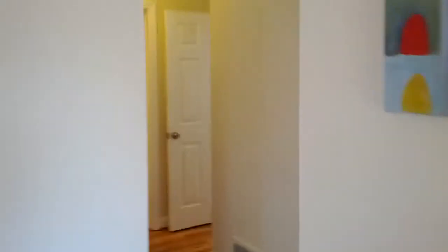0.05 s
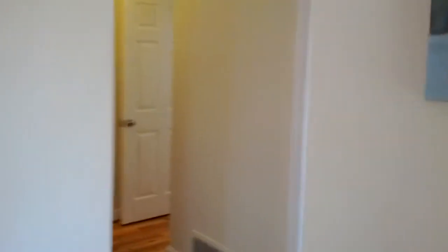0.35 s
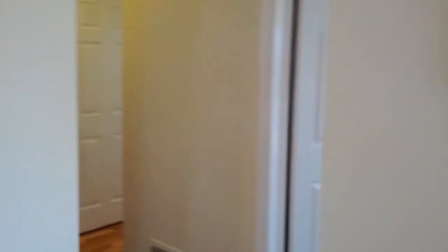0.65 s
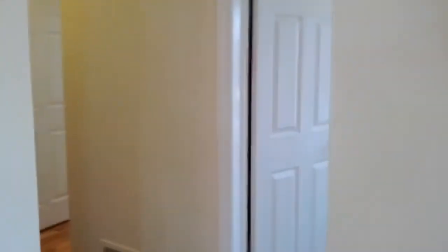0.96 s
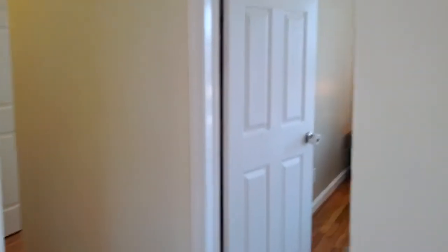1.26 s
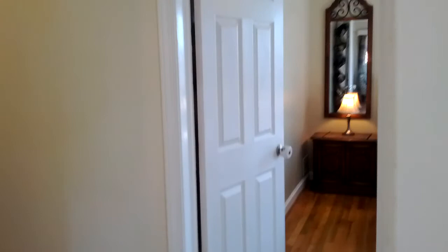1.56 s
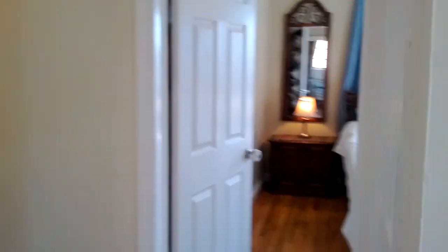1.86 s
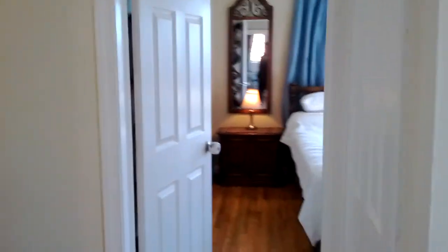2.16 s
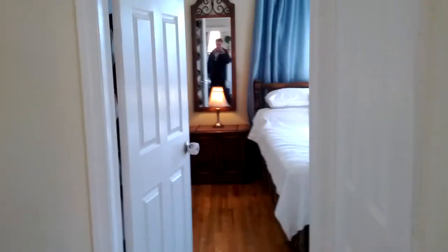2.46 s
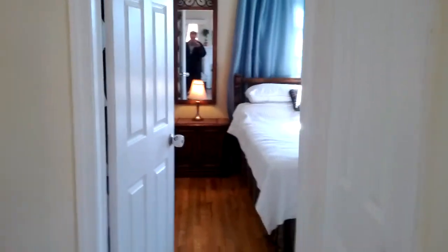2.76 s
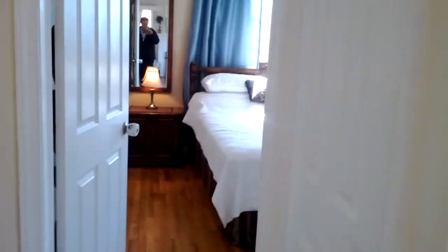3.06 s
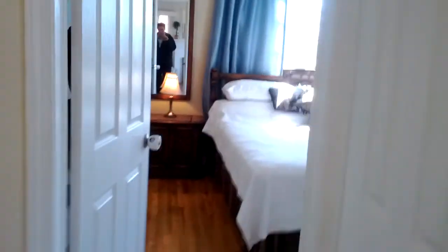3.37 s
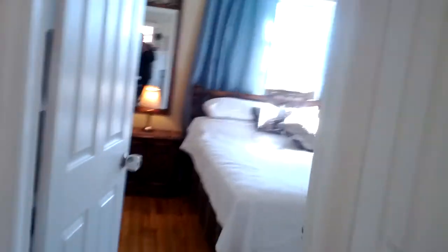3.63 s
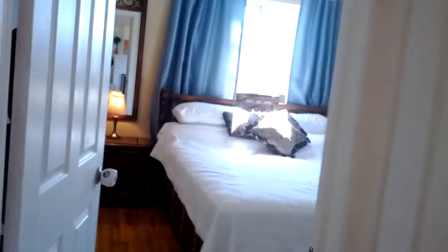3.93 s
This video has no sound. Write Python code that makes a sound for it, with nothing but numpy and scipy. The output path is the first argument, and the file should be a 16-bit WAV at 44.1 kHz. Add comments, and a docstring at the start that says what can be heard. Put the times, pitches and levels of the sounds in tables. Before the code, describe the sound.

Wooden floorboards creak and tick under slow, soft footsteps in a quiet hallway.

```python
"""Someone carries a camera slowly over a wooden floor in a quiet, faintly humming house.
First, clothes swish, soft steps thud and shake the camera, and fingers click on its case.
Then, from about 2.6 s, two floorboards creak in turn: the wood sticks and slips in quick snaps
that slow down into single ticks. At the very end come a low rumble, two clacks of a loose board
and a thud as the sound cuts off. A small bare hallway echoes the steps and the boards."""
import sys
import numpy as np
from scipy import signal
from scipy.fft import rfft, irfft, next_fast_len
from scipy.io import wavfile
from scipy.ndimage import map_coordinates

SR = 44100
rng = np.random.default_rng(int(sys.argv[2]) if len(sys.argv) > 2 else 0)


def output_pcm(signal):
    """Save a mono or channel-first signal as 16-bit PCM at the path in sys.argv[1].

    Samples are clipped to [-1, 1] before scaling.
    """
    pcm = np.clip(np.atleast_2d(signal).T, -1, 1) * 32767
    wavfile.write(sys.argv[1], SR, np.round(pcm).astype(np.int16))


N = 176400  # 4 seconds
SNAP_RISE_S = 0.00021

# The tone colour (how strong each pitch is) of rubbing fabric: pitch_hz, level_db
FABRIC_COLOUR = [(200, 4.5), (700, 3), (2000, -2.5), (5000, -6.5), (9000, -4.5), (12000, -8), (16000, -16)]


def creak(course, colour, knock_db, room_db, jitter, scatter_db, breakaway_db):
    """A board sticks and slips. Every slip rings alike, so a fast run of them has a pitch."""
    times, slips_per_s, levels_db = np.transpose(course)
    breakaway_s, fade_db_per_s = 0.0088, 13
    crack, ring = snap(lambda hz: along(colour, hz), knock_db, room_db)
    out, now = np.zeros(N), times[0]
    for lateness, weakness in rng.standard_normal((16, 2)):
        if now > times[-1]:
            break
        age = now - times[0]
        # The crack starts breakaway_db off its usual level, settles quickly, then slowly softens.
        crack_db = breakaway_db * np.exp(-age / breakaway_s) - fade_db_per_s * age
        slip_db = np.interp(now, times, levels_db) - scatter_db * weakness
        add(out, now, amp(slip_db) * (amp(crack_db) * crack + ring))
        now += (1 + jitter * lateness) / np.interp(now, times, slips_per_s)
    return out


def creaking_boards():
    """Two boards give under the foot, one after the other, each with its own tone."""
    # How each creak slows down: time_s, slips_per_s, level_db
    first_course = [(2.5742, 99.3, -31), (2.584, 136, -32), (2.592, 130, -33), (2.615, 116, -41),
                    (2.633, 96, -37.5), (2.644, 64, -39), (2.68, 52.7, -38), (2.706, 45, -37.5)]
    second_course = [(3.1123, 106.2, -34), (3.135, 109.9, -33), (3.165, 106.2, -36), (3.178, 94.7, -31.5),
                     (3.188, 61.4, -33), (3.206, 58, -39), (3.228, 55, -52)]
    # The tone colour of each board: pitch_hz, level_db
    first_colour = [(200, 2.5), (1000, -0.5), (2100, 0), (2800, 1), (3700, 3), (5000, -1), (7000, 1.5),
                    (9200, 3.5), (11500, -2.5), (16000, 0)]
    second_colour = [(110, 5), (250, -2.5), (440, 5.5), (680, 1.5), (850, -2), (2300, 0.5), (3700, -1),
                     (7400, 2), (8700, 2.5), (10300, -1), (11800, -3.5), (16000, -2)]
    first = creak(first_course, first_colour, knock_db=-0.5, room_db=1.5,
                  jitter=0.0088, scatter_db=0.2, breakaway_db=4.5)
    second = creak(second_course, second_colour, knock_db=0.5, room_db=-0.5,
                   jitter=0.0047, scatter_db=3.0, breakaway_db=-1)
    return first + second


def snap(shade, knock_db, room_db):
    """One slip of a board: a short crack, and the ring of floor, wall and hallway that follows."""
    # The tone colours of the crack and of the hallway: pitch_hz, level_db
    crack_colour = [(200, -15), (1300, 0.5), (3000, -4.5), (6000, -4.5), (9000, -4), (11500, -14),
                    (16000, -21)]
    hall_colour = [(60, -14), (150, 5.5), (400, 2.5), (800, 0), (1400, -2.5), (2800, -5.5), (4800, -8),
                   (7000, -10.5), (8800, -11), (11500, -17), (16000, -29)]
    # The notes the floor rings at: pitch_hz, level_db, fade_s
    floor_notes = [(103.2, -1.5, 0.15), (151.5, 0, 0.62), (224.2, -4, 0.47), (306.5, 2, 0.19),
                   (426.8, -3.5, 0.31), (652.6, -4.5, 0.16)]
    size = len(ring_time())
    crack = noise(crack_colour, size, shade, spiky_db=-2.5)
    crack *= envelope(SNAP_RISE_S, fade_s=0.0063, hold_s=0.0024)
    knock = ringing_wood(floor_notes, shade)
    hall_echo = hallway(noise(hall_colour, size, shade))
    ring = amp(knock_db - 14) * knock + amp(room_db - 4.5) * hall_echo
    wall_echo = noise(crack_colour, size, shade) * envelope(rise_s=0.0015, fade_s=0.031)
    add(ring, start_s=0.016, sound=amp(-3.5) * wall_echo)
    return crack, ring


def ringing_wood(notes, shade=lambda hz: 0):
    """Knocked wood rings at several notes at once, each dying away at its own speed."""
    t, out = ring_time(), 0
    for hz, level_db, fade_s in notes:
        tone = np.sin(2 * np.pi * (hz * t + rng.random()))
        out += amp(level_db + shade(hz)) * tone * envelope(SNAP_RISE_S, fade_s)
    return out


def ticks():
    """Lone slips as weight comes on or off a board. Each spot has its own woody peak in the tone."""
    # Single snaps: start_s, level_db, brightness_db_per_octave, knock_db, peak_hz, boost_db, room_db
    slips = [(.589, -45, -6, -1, 900, 3, -7), (2.2577, -53, -1, 0, 5000, 5, 2),
             (2.3422, -38, -.7, 1, 2900, 4, 0), (2.7655, -42, -1, 0, 2800, 4, 2),
             (2.836, -35, -.7, -2, 1100, 3, -2), (3.2649, -29, .5, -4, 1600, 3, -3),
             (3.3082, -30, .2, -2, 1100, 5, -2), (3.4418, -47, -3, -8, 1550, 10, -7),
             (3.5226, -46, -2, -14, 1650, 16, -10), (3.5378, -44, 1, -8, 1800, 3, -5),
             (3.6206, -49, -1, -2, 1600, 4, -2), (3.8242, -39, -3, -4, 1700, 3, -3),
             (3.9002, -44, .7, -6, 1300, 2, -1)]
    out = np.zeros(N)
    for start_s, level_db, brightness, knock_db, peak_hz, boost_db, room_db in slips:
        def shade(hz):
            tilt_db = brightness * np.log2(np.maximum(hz, 230))  # flat below 230 Hz
            return tilt_db + boost_db * hump(hz, peak_hz, width_octaves=0.38)
        crack, ring = snap(shade, knock_db, room_db)
        add(out, start_s, amp(level_db) * (crack + ring))
    return out


def clacks():
    """A loose board clacks twice: a hard crack and a short, hollow ring."""
    # The two hits: start_s, level_db, wood_ring_db
    hits = [(3.9537, -32.5, 2), (3.9756, -34, 7)]
    # The notes the loose board rings at: pitch_hz, level_db, fade_s
    board_notes = [(282, -5.5, .16), (648, -7, 0.098), (1052, -4.5, 0.063), (1210, -8, 0.052),
                   (1362, -3, .08), (2170, -13, .05), (3680, -9.5, 0.041)]
    colour = [(500, 0.5), (3500, -0.5), (9000, -2.5), (15000, -2)]  # pitch_hz, level_db
    out = np.zeros(N)
    for start_s, level_db, wood_ring_db in hits:
        wood = amp(wood_ring_db) * ringing_wood(board_notes)
        crack, ring = snap(lambda hz: along(colour, hz), knock_db=1, room_db=1)
        add(out, start_s, amp(level_db) * (crack + ring + wood))
    return out


def thuds():
    """Low thuds. In a step, a soft heel rings the floor, the hallway booms on and the sole scuffs."""
    # Soft steps; the last two rows are a low rumble and a thud as the sound cuts off.
    # Columns: start_s, level_db, pitch_hz, scuff_db, fade_s
    low_hits = [(.415, -40.5, 183.5, -12.5, 0.071), (0.589, -43, 157.6, -11.5, 0.029),
                (.92, -54, 192, -12, 0.072), (1.191, -46, 204, -24, 0.088), (1.227, -48, 100, -25, 0.094),
                (1.288, -47, 182, -16, 0.16), (1.358, -44, 285, -18, 0.066), (1.423, -48.5, 237, -37, 0.33),
                (1.611, -45.5, 310, -24, 0.045), (1.996, -37.5, 171, -36, 0.053),
                (2.143, -45, 159, -5, 0.055), (2.5424, -34.5, 159, -3.5, 0.039),
                (3.749, -38, 270, -30, 0.052), (3.86, -50, 220, -8, 0.1), (3.983, -36, 272, -27, 0.092)]
    scuff_colour = [(300, 6.5), (900, -3.5), (1800, -24), (9000, -19), (15000, -32)]  # pitch_hz, level_db
    out, t = np.zeros(N), ring_time()
    for start_s, level_db, pitch_hz, scuff_db, fade_s in low_hits:
        thud = 2 * np.sin(2 * np.pi * pitch_hz * t) * envelope(0.0014, fade_s)
        rumble = filtered(rng.standard_normal(len(t)), lambda hz: hump(hz, pitch_hz, width_octaves=0.5))
        boom = amp(-9) * hallway(unit(rumble))
        scuff = amp(scuff_db) * noise(scuff_colour, len(t)) * envelope(SNAP_RISE_S, fade_s=0.37)
        add(out, start_s, amp(level_db) * (thud + boom + scuff))
    return out


def jolts():
    """Each stride shakes the camera in the hand: a deep wobble that soon dies away."""
    # The shakes: start_s, level_db, pitch_hz
    shakes = [(0.443, -39.5, 23.7), (0.596, -39, 27.3), (1.208, -34.5, 35), (1.289, -38.5, 45.2),
              (1.561, -57, 36), (2.009, -40.5, 54), (2.55, -40, 61.8)]
    out = np.zeros(N)
    for start_s, level_db, pitch_hz in shakes:
        wobble = np.sin(2 * np.pi * pitch_hz * ring_time())
        add(out, start_s, amp(level_db) * wobble * envelope(rise_s=0.005, fade_s=0.55))
    return out


def clothes():
    """Fabric swishes with the stride, fluttering slightly."""
    # How the swish swells and sinks: time_s, level_db
    swish = [(0, -58.5), (.25, -57), (.45, -62.5), (.6, -59), (1.11, -62), (1.31, -55), (1.41, -56),
             (1.52, -65), (1.72, -61.5), (1.86, -68), (2.1, -59), (2.25, -64.5), (2.35, -57), (2.5, -65.5),
             (3.05, -64), (3.5, -58.5), (3.7, -63), (3.82, -58.5)]
    times, levels_db = np.transpose(swish)
    t = np.arange(N) / SR
    flutter_db = 1.28 * map_coordinates(rng.standard_normal(200), [t * 40])  # 40 random values a second
    return amp(np.interp(t, times, levels_db) + 2 + flutter_db) * noise(FABRIC_COLOUR, N)


def handling():
    """Fingers click on the camera's case and fabric brushes close to the microphone."""
    # Finger clicks and fabric brushes: start_s, level_db
    finger_clicks = [(.708, -38), (1.2975, -44)]
    fabric_brushes = [(.356, -52), (3.105, -49)]
    case_colour = [(2000, -9), (5000, 4), (16000, -3)]  # pitch_hz, level_db
    out, t = np.zeros(N), ring_time()
    for start_s, level_db in finger_clicks:
        click = noise(case_colour, len(t)) * amp(-60 * t / 0.002)  # gone in 2 ms
        add(out, start_s, amp(level_db) * click)
    for start_s, level_db in fabric_brushes:
        brush = noise(FABRIC_COLOUR, len(t)) * envelope(rise_s=0.0013, fade_s=0.17)
        add(out, start_s, amp(level_db) * brush)
    return out


def hallway(steady_noise):
    """Turn steady noise into the hallway's echo, where the high pitches die first."""
    # How long the echo lasts: pitch_hz, fade_s
    echo_times = [(100, 0.62), (500, 0.48), (2500, 0.43), (8000, 0.26), (15000, 0.24)]
    hz, t, spectrum = signal.stft(steady_noise, SR, nperseg=256)
    fade = amp(-60 * t / along(echo_times, hz)[:, None])
    echo = signal.istft(spectrum * fade, SR, nperseg=256)[1][:len(steady_noise)]
    return echo * (1 - np.exp(-ring_time() / 0.00098))  # builds up in about 1 ms


def house():
    """The low rush of a quiet room, with a faint hum from the mains electricity."""
    # The tone colour of the quiet room: pitch_hz, level_db
    room_colour = [(12, -42), (20, 3), (65, 5.5), (120, -6.5), (187, -6.5), (241, -3.5), (262, -15.5),
                   (434, -10), (527, -24.5), (738, -20.5), (2320, -26), (8890, -30), (16000, -30)]
    hum_hz = 60.4
    hum = np.sin(2 * np.pi * hum_hz * np.arange(N) / SR)
    return amp(-56.5) * noise(room_colour, N) + amp(-61.5) * hum


def amp(db):
    """Turn decibels into a number to multiply by."""
    return 10 ** (np.asarray(db) / 20)


def unit(x):
    """Scale a sound to an average strength (rms) of 1."""
    return x / np.sqrt(np.mean(x ** 2) + 1e-20)


def along(points, hz):
    """Read between (pitch_hz, value) points, with pitch spaced in octaves."""
    pitches, values = np.transpose(points)
    return np.interp(np.log(hz + 1), np.log(pitches + 1), values)


def hump(hz, peak_hz, width_octaves):
    """A curve that is 1 at the peak and falls to half at width_octaves on either side."""
    return 1 / (1 + (np.log2((hz + 1) / peak_hz) / width_octaves) ** 4)


def filtered(x, gain):
    """Multiply each pitch in a sound by gain(hz)."""
    size = next_fast_len(len(x) + 8192)
    return irfft(rfft(x, size) * gain(np.fft.rfftfreq(size, 1 / SR)), size)[:len(x)]


def noise(colour, size, shade=lambda hz: 0, spiky_db=0):
    """Noise with a tone colour. shade(hz) adds decibels at each pitch; spiky_db makes it crackle."""
    white, spikes = rng.standard_normal((2, size))
    grainy = white * amp(spiky_db * spikes)
    return unit(filtered(grainy, lambda hz: amp(along(colour, hz) + shade(hz))))


def add(out, start_s, sound):
    """Mix a sound into out, beginning at start_s."""
    part = out[round(start_s * SR):][:len(sound)]
    part += sound[:len(part)]


def ring_time():
    """The sample times of one hit, 0.75 s long."""
    return np.arange(SR * 3 // 4) / SR


def envelope(rise_s, fade_s, hold_s=0):
    """The loudness of a hit: it rises, holds, then falls by 60 dB every fade_s."""
    t = ring_time()
    return (1 - np.exp(-t / rise_s)) * amp(-60 * np.maximum(t - hold_s, 0) / fade_s)


def scene():
    """Mix the floor, the walker and the house into one channel."""
    boards = creaking_boards() + ticks() + clacks()
    return (boards + thuds() + jolts() + clothes() + handling() + house())[None]


def record(dry):
    """The camera keeps no pitch above its upper limit."""
    top_hz = 15900
    return filtered(dry[0], lambda hz: hz < top_hz)[None]


dry = scene()
out = record(dry)
output_pcm(out)
```